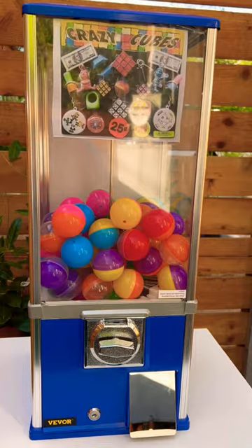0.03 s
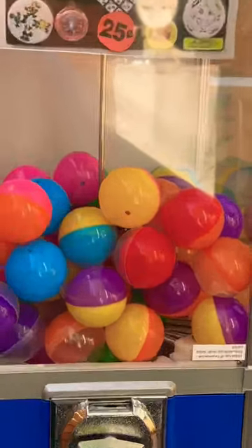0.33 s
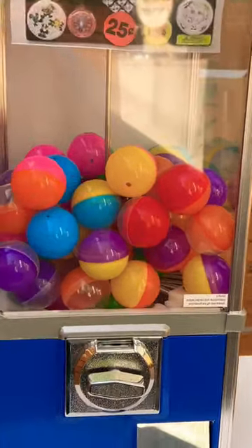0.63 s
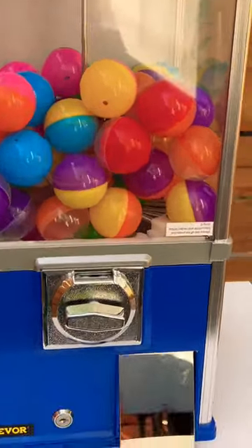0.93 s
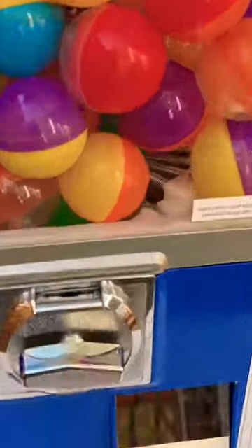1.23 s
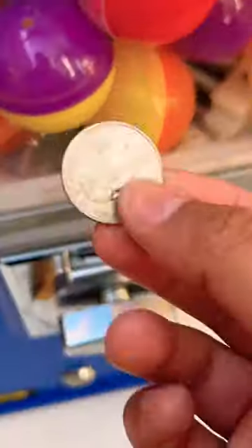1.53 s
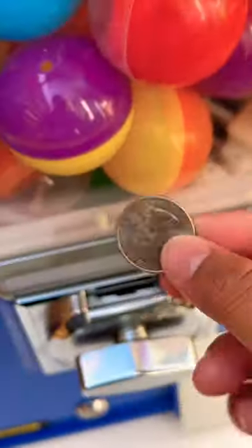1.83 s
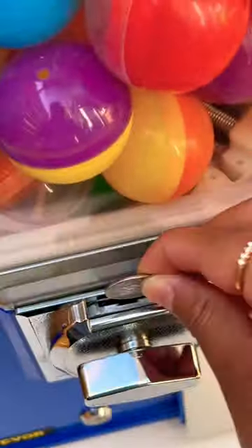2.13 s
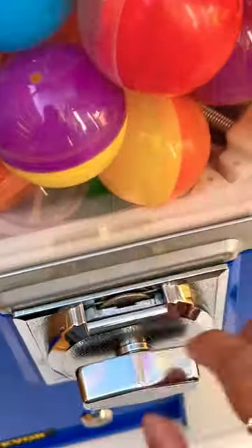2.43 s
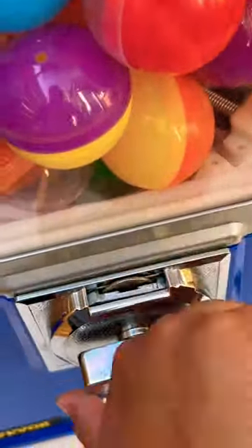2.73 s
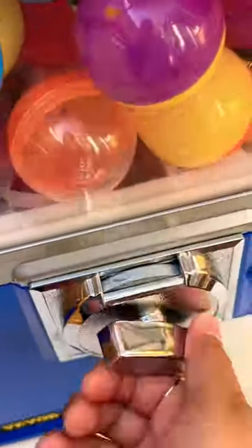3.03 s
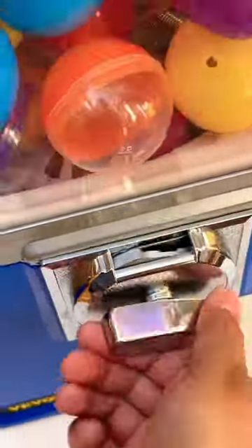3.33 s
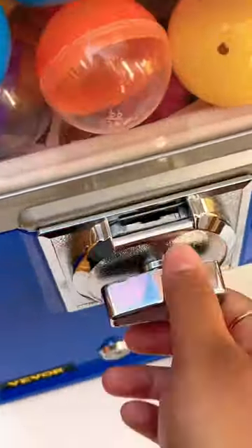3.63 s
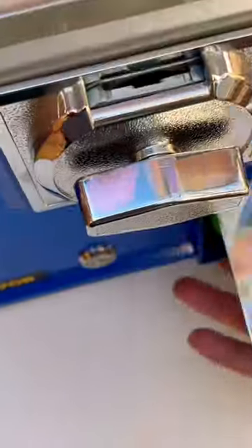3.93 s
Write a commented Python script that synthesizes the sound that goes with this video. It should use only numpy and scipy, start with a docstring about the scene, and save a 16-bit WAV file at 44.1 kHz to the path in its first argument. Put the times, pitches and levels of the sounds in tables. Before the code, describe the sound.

The metal crank of a toy capsule machine ratchets close by. First a coin clicks into the slot, then two grinding half turns bring sharp clacks and cabinet knocks, and the chute flap clinks. Faint crickets trill outdoors.

```python
"""Coin and crank of a toy capsule machine

A coin is pushed in and the metal crank is turned, close by. The gears grind by stick and slip in
two half turns, the ratchet clacks, loose parts knock in the cabinet and the chute flap rings.
Each impact is a cluster of tiny contacts that excites the damped modes of the part struck.
Outdoors behind it are a low wash, a faint hum and trilling insects."""
import sys
import numpy as np
from scipy import signal
from scipy.fft import rfft, irfft
from scipy.io import wavfile

SR = 44100
rng = np.random.default_rng(int(sys.argv[2]) if len(sys.argv) > 2 else 0)


def generate_wav(signal):
    """Clip the signal to [-1, 1] and save it as 16-bit WAV at the path in sys.argv[1]."""
    frames = np.transpose(np.atleast_2d(signal))
    scaled = np.clip(frames, -1, 1) * 32767
    pcm = np.round(scaled).astype(np.int16)
    wavfile.write(sys.argv[1], SR, pcm)


N = 176400
T, HZ = np.arange(N) / SR, np.fft.rfftfreq(N, 1 / SR)
RING_T = T[:SR // 4]

# Edges of the bass, mid, bright and treble bands (frequency [Hz])
BAND_EDGES = [145, 500, 2000, 6000, 16500]
BAND_FILTERS = [signal.butter(2, edges, "band", fs=SR, output="sos")
                for edges in zip(BAND_EDGES, BAND_EDGES[1:])]

# Pressure on the turning gears (time [s], level [dB])
GEAR_FORCE = [(2.79,-44.5), (2.82,-39), (2.865,-47), (2.89,-32), (2.935,-21), (2.96,-31), (3.0,-29.5),
              (3.05,-42), (3.08,-34), (3.12,-54), (3.16,-36), (3.2,-42.5), (3.24,-30), (3.28,-28),
              (3.335,-24.5), (3.37,-35), (3.41,-44), (3.47,-58)]
# Rocking of the whole machine (frequency [Hz], width [Hz], level at full force [dB])
ROCKING_BANDS = [(42,53,-38.5), (83,62,-35), (207,33,-29.5)]
# Pawl drops and hollow plastic capsules bumping
# (time [s], bass [dB], mid [dB], bright [dB], treble [dB], chatter time [s], pitch [Hz])
PAWL_CLACKS = [(2.896,-31,-29,-15,-17,0.0022,3740), (2.926,-39,-16,-13.5,-22.5,0.0011,3420),
               (2.9295,-25.5,-21.5,-12.5,-15,0.0004,10800), (2.968,-26,-26,-34,-23,0.0005,10100),
               (2.9845,-22.5,-15.5,-8.5,-11,0.001,4910), (3.0215,-20.5,-17.5,-10,-11.5,0.00076,5780),
               (3.2652,-18.5,-15,-12,-15.5,0.0012,3410), (3.2768,-24,-28,-12,-14,0.0008,8100),
               (3.304,-23,-18.5,-12,-14.5,0.0013,8100), (3.3205,-21.5,-19,-8.5,-9,0.00064,7900),
               (3.3385,-27,-17.5,-14.5,-19.5,0.00059,3400), (3.346,-23,-15.5,-7.5,-9.5,0.00039,5800),
               (3.579,-22.5,-17,-12.5,-17,0.00088,3290)]
CAPSULE_BUMPS = [(2.911,-17,-17,-28,-38,0.00093,1160), (3.42,-35,-22.5,-26,-30,0.0054,664),
                 (3.7225,-25.5,-20,-31,-37,0.0038,777), (3.868,-58,-28.5,-34.5,-37.5,0.0071,786)]
# Coin against the slot, its loose holder rocking, coin and handle knocking in the cabinet
# (time [s], bass [dB], mid [dB], bright [dB], treble [dB], chatter time [s])
COIN_CLICKS = [(2.214,-34.5,-35,-29.5,-36.5,0.0034), (2.288,-36,-34.5,-33.5,-34,0.0022),
               (2.336,-40,-45,-27,-19,0.00073), (2.349,-29,-27.5,-28,-30.5,0.0032)]
HOLDER_CLINKS = [(.881,-53,-32.5,-35,-47,0.0032), (2.433,-26.5,-19.5,-17.5,-37,0.0016),
                 (2.439,-27,-26.5,-25,-53,0.0018), (2.666,-23.5,-20,-21,-41.5,0.0028),
                 (3.538,-53,-35.5,-33,-56,0.001), (3.625,-38,-51,-39.5,-55,0.00052)]
CABINET_KNOCKS = [(2.226,-33,-30,-31.5,-70,0.0031), (2.375,-21,-27.5,-40,-54,0.0027),
                  (2.381,-24,-23,-23.5,-29.5,0.0024), (2.595,-22,-22.5,-26,-32,0.0027),
                  (2.622,-30.5,-34,-33,-38.5,0.0036), (2.814,-21,-20.5,-26.5,-33,0.0031),
                  (2.836,-61,-25,-26.5,-32.5,0.0047), (2.875,-17.5,-17,-19,-23,0.0046),
                  (2.941,-29,-22,-20.5,-30,0.0025), (2.998,-32,-23,-24.5,-27,0.0056),
                  (3.034,-24.5,-37,-40,-44,0.007), (3.063,-24,-16.5,-22.5,-26.5,0.0044),
                  (3.073,-27,-19.5,-19.5,-30,0.0027), (3.099,-29.5,-25,-25.5,-32,0.0085),
                  (3.132,-33,-26.5,-36,-41,0.0013), (3.152,-32,-19,-22,-27.5,0.0068),
                  (3.168,-30,-22,-37,-38,0.00081), (3.223,-54,-25,-38,-40,0.0026),
                  (3.242,-26.5,-20.5,-37,-38,0.0066), (3.29,-39,-19.5,-23,-20.5,0.0012),
                  (3.385,-22.5,-21,-22.5,-29.5,0.0022), (3.549,-29.5,-30,-32.5,-36,0.0055),
                  (3.563,-21.5,-17.5,-22,-32,0.0057), (3.7175,-25.5,-19,-25.5,-28,0.00067),
                  (3.8165,-60,-44,-43,-40.5,0.00073), (3.84,-29,-26,-34,-39.5,0.0051),
                  (3.884,-43,-39,-38,-32.5,0.011), (3.9065,-27,-21,-20,-26.5,0.0039)]
# Faint handling ticks (time [s], level before band offsets [dB])
HANDLING_TICKS = [(.094,-50.5), (0.485,-51.5), (.612,-53), (.69,-55), (1.219,-50.5), (1.759,-45.5),
                  (1.811,-51), (1.979,-45), (2.074,-46.5)]
# Nudges of the chute flap (time [s], level [dB], chatter time [s], tilt [dB/octave])
FLAP_TOUCHES = [(3.753,-27,0.0031,23), (3.9064,-28.5,0.0058,-8)]

# Modes of each ringing part (frequency [Hz], relative level [dB], 60 dB decay time [s])
STEEL_MODES = [(3400,-18,0.016), (4800,-2,0.017), (5840,13,0.011), (7900,1,0.0094), (9320,1.5,0.02),
               (10880,4.5,0.011), (11700,5,0.0095)]
COIN_MODES = [(6100,-7,.015), (7850,-7,.015), (9491,-2,.022), (11500,1,.015), (12590,7,.017),
              (13060,-2,.025), (15470,6,.028)]
HOLDER_MODES = [(1133,-17.5,0.046), (2640,6,0.033), (2940,-4.5,0.022), (4200,-20,0.028)]
CABINET_MODES = [(203,-20.5,0.083), (250.4,-10,0.05), (767,-12,0.094), (933,-11.5,0.059), (1070,-5,0.021),
                 (1274,-6,0.082), (1688,-51,0.15), (1910,-15,0.071), (2404,-1.5,0.026), (3460,-18,0.33),
                 (6300,2,0.03)]
FLAP_MODES = [(3334,4,0.15), (3480,-2,0.21), (3840,-4,0.12), (4140,-6,0.051), (5400,-25,.1),
              (5600,-20,0.077), (5800,10,0.035), (6300,-8,.09), (6960,-4,0.027), (8200,-14,0.035),
              (8700,-8,0.025), (12400,-31,.025)]
# Response of the machine's body (frequency [Hz], gain [dB])
BODY_RESPONSE = [(47, -67), (80, -6), (212, -4), (303, -1), (346, -1), (515, 0.5), (643, -0.5), (917, -8),
                 (1490, -13), (1670, -4), (2430, -4.5), (3390, -8), (4050, -13), (5900, -8.5), (7200, -7),
                 (7870, -9), (8600, -12.5), (11200, -21), (16000, -27)]
# Spectrum of the cabinet rattle (frequency [Hz], relative level [dB])
RATTLE_SPECTRUM = [(200,1), (900,-2), (2500,-1), (6000,1), (15000,-27)]
# Damping of the rattle (frequency [Hz], 60 dB decay time [s])
RATTLE_DECAY = [(100,0.09), (400,0.14), (1500,0.15), (4000,0.048), (15000,0.11)]
# Left-right likeness of the rattle and the outdoor wash (frequency [Hz], correlation [0-1])
RATTLE_CORRELATION = [(200,1), (700,0.86), (1200,0.35), (1800,1), (4000,0.97), (6000,1), (15000,.1)]
WASH_CORRELATION = [(60, 1.0), (130, 1), (290, 1), (640, 0.59), (1410, 0.64), (3100, 1), (6820, 0.99),
                    (15000, 0.12)]

# Envelopes of the hand's rustle and a high insect whine (time [s], level [dB])
RUSTLE_LEVEL = [(.75,-78), (1.02,-52.5), (1.12,-61), (1.24,-53.5), (1.4,-61), (1.85,-89), (1.98,-51),
                (2.12,-60), (2.25,-54.5), (2.5,-58)]
WHINE_LEVEL = [(.85,-63.5), (1,-65.5), (2.2,-69)]
# Band edges of the rustle (frequency [Hz])
RUSTLE_BAND = [1480, 7250]
# Cricket trills (start [s], end [s], pitch [Hz], level [dB], pulse rate [1/s])
CRICKET_BOUTS = [(0,0.75,3025,-53.5,23.05), (0,1.5,3200,-59.5,23.05), (.6,.88,4960,-64,24.3),
                 (1.199,1.55,3066,-55.5,25.2), (1.578,3.9,3026,-58.5,25.2), (1.581,2.6,3260,-61,24),
                 (1.977,2.53,3140,-53.5,23.7)]
# Outdoor wash (frequency [Hz], relative spectral density [dB])
WASH_SPECTRUM = [(20,-12.5), (45,-1.5), (87,-4), (115,-7), (161,-10.5), (240,-6.5), (373,-3.5), (500,-8),
                 (1020,-14), (1260,-16.5), (1600,-18), (2700,-27), (3900,-32.5), (5400,-29.5), (6500,-33.5),
                 (8000,-34.5), (9800,-40), (11000,-40), (12000,-43.5), (15500,-40)]
# Phase between the microphone ports (frequency [Hz], left lead [rad])
PORT_PHASE = [(300,0), (700,-.2), (1600,0), (4700,0), (5600,-1.05), (8000,-1.3), (15000,-1.6)]
# Balance of the ports (frequency [Hz], left minus right [dB])
PORT_BALANCE = [(200,0.5), (700,-2.5), (2200,0), (10000,0.1)]

FULL_FORCE_DB, GEAR_STEEL_DB = -21.5, -19
GRIND_BANDS_DB, GRIND_GROWTH = [0.5, 3.5, 4, 1], [.8, .9, 1.1, 1.25]  # growth: dB per dB of force
PAWL_NOTE, CAPSULE_NOTE = (11.4, 0.009), (8.9, 0.052)  # (relative level [dB], 60 dB decay time [s])
STEEL_DB, COIN_DB, HOLDER_DB, PANEL_DB = -24, -24, -12.5, -40  # gains of the modes
METAL_RATTLE_DB, CABINET_RATTLE_DB = 0.5, -0.5
TICK_BANDS_DB, TICK_CHATTER_S = [7.3, 7, 7.6, 3.4], 0.0041
CONTACTS_PER_S, LEAD_S = 14000, .02  # scraping begins LEAD_S before an impact


def gears():
    """Stick-slip friction: random slips excite cabinet and steel, brighter under pressure."""
    cabinet = body(CABINET_MODES, PANEL_DB, CABINET_RATTLE_DB)
    steel = amp(GEAR_STEEL_DB) * body(STEEL_MODES, STEEL_DB, METAL_RATTLE_DB)
    force_db = level_curve(GEAR_FORCE) - FULL_FORCE_DB
    slips = contacts(N, per_s=3000, spread_db=2)[None]
    out = np.zeros((2, N))
    for band, db, growth in zip(cabinet + steel, GRIND_BANDS_DB, GRIND_GROWTH):
        grind = unit(signal.oaconvolve(slips, band, axes=1)[:, :N])
        out += grind * amp(FULL_FORCE_DB + db + growth * force_db)
    return out


def ratchet():
    """Impact excitation: each drop of the pawl rings short-lived steel modes."""
    return impacts(PAWL_CLACKS, STEEL_MODES, STEEL_DB, METAL_RATTLE_DB, PAWL_NOTE)


def rocking():
    """Forced vibration: the machine rumbles as the square root of the force on the crank."""
    force_db = level_curve(GEAR_FORCE) - FULL_FORCE_DB
    return sum(narrow_noise(hz, width) * amp(db + force_db / 2) for hz, width, db in ROCKING_BANDS)


def coin():
    """Free vibration after impact: the coin rings in high modes, its loose holder in lower ones."""
    clicks = impacts(COIN_CLICKS, COIN_MODES, COIN_DB, METAL_RATTLE_DB)
    return clicks + impacts(HOLDER_CLINKS, HOLDER_MODES, HOLDER_DB, CABINET_RATTLE_DB)


def loose_parts():
    """Structure-borne sound: knocks, ticks and capsule bumps radiate through the cabinet."""
    ticks = [(s, *(db + np.array(TICK_BANDS_DB)), TICK_CHATTER_S) for s, db in HANDLING_TICKS]
    knocks = impacts(CABINET_KNOCKS + ticks, CABINET_MODES, PANEL_DB, CABINET_RATTLE_DB)
    return knocks + impacts(CAPSULE_BUMPS, CABINET_MODES, PANEL_DB, CABINET_RATTLE_DB, CAPSULE_NOTE)


def flap(scrape_db=-4.5):
    """Plate resonance: a scrape drives the modes of the thin metal flap."""
    out = np.zeros((2, N))
    for s, db, chatter_s, tilt in FLAP_TOUCHES:
        scrape = chatter(chatter_s)
        ringing = 0
        for hz, level, t60 in FLAP_MODES:
            mode = unit(signal.fftconvolve(scrape, ring([(hz, 0, t60)])))
            ringing += amp(level + tilt * np.log2(hz)) * mode
        scrape = np.pad(scrape, (0, len(ringing) - len(scrape)))
        sound = unit(ringing) + amp(scrape_db) * unit(scrape)
        add(out, s - LEAD_S, at_level(np.array([sound, sound]), db))
    return out


def impacts(rows, modes, ring_db, rattle_db, note=()):
    """Convolution: each chatter drives the body's response; a row with a pitch adds that mode."""
    out = np.zeros((2, N))
    for s, bass, mid, bright, treble, chatter_s, *pitch in rows:
        response = body(modes + [(hz, *note) for hz in pitch], ring_db, rattle_db)
        bands = signal.fftconvolve(response, chatter(chatter_s)[None, None], axes=2)
        sound = sum(at_level(band, db) for band, db in zip(bands, (bass, mid, bright, treble)))
        add(out, s - LEAD_S, sound)
    return out


def body(modes, ring_db, rattle_db):
    """Impulse response of the machine in four bands: a crack, modes and a random, decaying rattle."""
    size = len(RING_T)
    hz, t, spectra = signal.stft(noise_pair(RATTLE_CORRELATION, size), SR, nperseg=256)
    decay_db = 60 * t / at_hz(RATTLE_DECAY, hz)[:, None]
    spectra *= amp(at_hz(RATTLE_SPECTRUM, hz)[:, None] - decay_db)
    rattle = signal.istft(spectra, SR, nperseg=256)[1][:, :size] / 20
    crack = RING_T == 0
    response = crack + amp(ring_db) * ring(modes) + amp(rattle_db) * rattle
    log_gain = np.log(amp(at_hz(BODY_RESPONSE, abs(np.fft.fftfreq(size, 1 / SR)))))
    minimum_phase = np.exp(np.conj(signal.hilbert(log_gain)))
    response = np.fft.ifft(np.fft.fft(response) * minimum_phase).real
    return np.array([signal.sosfilt(band, response) for band in BAND_FILTERS])


def ring(modes):
    """Modal superposition: a struck part sounds as a sum of damped sinusoids."""
    return sum(amp(db - 60 * RING_T / t60) * np.cos(2 * np.pi * hz * RING_T) for hz, db, t60 in modes)


def chatter(chatter_s, scrape_db=-14, scrape_stretch=2.5):
    """Repeated contact: a cluster swells for chatter_s and dies, inside a longer, softer scrape."""
    age = (T[:SR // 10] - LEAD_S) / chatter_s
    after = np.maximum(age, 0)
    cluster = after * np.exp(1 - after)
    scrape = amp(scrape_db) * np.exp(-abs(age - 1) / scrape_stretch)
    return contacts(len(age), CONTACTS_PER_S, spread_db=2.5) * (cluster + scrape)


def contacts(size, per_s, spread_db):
    """Shot noise: tiny contacts of random moment, sign and strength."""
    impulses = (rng.random(size) < per_s / SR) * rng.choice([-1, 1], size)
    return impulses * amp(spread_db * np.clip(rng.standard_normal(size), -2, 2))


def rustle():
    """Friction noise: fine grains from the hand shifting with the coin."""
    band = signal.butter(2, RUSTLE_BAND, "band", fs=SR, output="sos")
    grains = signal.sosfilt(band, contacts(N, CONTACTS_PER_S, spread_db=2))
    return unit(grains) * amp(level_curve(RUSTLE_LEVEL))


def cricket(start, end, hz, db, rate, fade_s=0.19, depth=.65):
    """Amplitude modulation: a wavering, raspy tone pulses through one bout of trilling."""
    bout = np.clip(np.minimum(T - start, end - T) / fade_s + 1, 0, 1)
    pulses = 1 - depth * np.cos(2 * np.pi * rate * (T - start))
    tone = wavering(hz, wander_hz=6.07, width_hz=62)
    rasp = amp(-7) * narrow_noise(hz, width_hz=200)
    return amp(db) * bout * unit(pulses * (tone + rasp))


def outdoors():
    """Superposition of distant sources: a wash, a hum, a throbbing and a whining insect, crickets."""
    wash_spectrum = rfft(noise_pair(WASH_CORRELATION, N)) * amp(at_hz(WASH_SPECTRUM, HZ))
    wash = amp(-41) * unit(irfft(wash_spectrum, N))
    throb = 1 + 0.96 * np.sin(2 * np.pi * 9.6 * T)
    buzz = amp(-63.5) * unit(narrow_noise(hz=5590, width_hz=490) * throb)
    whine = narrow_noise(hz=10620, width_hz=430) * amp(np.interp(T, *np.transpose(WHINE_LEVEL)))
    hum = amp(-48.5) * wavering(hz=117, wander_hz=3.32, width_hz=9.6)
    return wash + hum + buzz + whine + sum(cricket(*bout) for bout in CRICKET_BOUTS)


def wavering(hz, wander_hz, width_hz):
    """Frequency modulation: slow noise moves a tone's pitch by wander_hz rms."""
    pitch = hz + wander_hz * narrow_noise(0, width_hz)
    return unit(np.sin(2 * np.pi * np.cumsum(pitch) / SR))


def narrow_noise(hz, width_hz):
    """Resonant filtering: white noise narrowed to a band around hz."""
    return unit(irfft(rfft(rng.standard_normal(N)) / (1 + (2 * (HZ - hz) / width_hz) ** 2), N))


def noise_pair(correlation, size):
    """Partial coherence: two white noises whose likeness depends on frequency."""
    left, independent = rfft(rng.standard_normal((2, size)))
    shared = np.clip(at_hz(correlation, np.fft.rfftfreq(size, 1 / SR)), 0, 1)
    right = shared * left + np.sqrt(1 - shared ** 2) * independent
    return irfft(np.array([left, right]), size)


def amp(db):
    """Decibels to amplitude ratio."""
    return 10 ** (np.asarray(db) / 20)


def unit(x):
    """Normalisation to rms 1."""
    return x / np.sqrt(np.mean(x ** 2) + 1e-20)


def at_level(x, db):
    """Energy normalisation: a short stereo sound gets the energy of 10 ms at this level."""
    return amp(db) * x / np.sqrt(np.sum(x ** 2) / (2 * SR / 100) + 1e-20)


def at_hz(points, hz):
    """Interpolation on a log-frequency axis."""
    knots_hz, values = np.transpose(points)
    return np.interp(np.log(hz + 1), np.log(knots_hz + 1), values)


def level_curve(points):
    """Interpolation of decibels over time, silent beyond the ends."""
    return np.interp(T, *np.transpose(points), left=-150, right=-150)


def add(mix, s, sound):
    """Superposition of a sound onto the mix at time s."""
    part = mix[:, round(s * SR):][:, :sound.shape[-1]]
    part += sound[..., :part.shape[1]]


def scene():
    """Linear mixing: crank, coin and flap sum with the outdoor background."""
    crank = gears() + ratchet() + rocking()
    return crank + coin() + loose_parts() + flap() + rustle() + outdoors()


def record(dry, open_s=.035, cutoff_hz=15900):
    """Stereo pickup: two ports differ in level and phase, saturate softly and are band-limited."""
    port = amp(at_hz(PORT_BALANCE, HZ) / 2) * np.exp(.5j * at_hz(PORT_PHASE, HZ))
    pressure = irfft(rfft(dry) * np.array([port, 1 / port]), N)
    saturated = np.tanh(pressure) * (T > open_s)
    lowpass = signal.firwin(255, cutoff_hz, window=("kaiser", 9), fs=SR)
    return signal.oaconvolve(saturated, lowpass[None], "same")


dry = scene()
out = record(dry)
generate_wav(out)
```